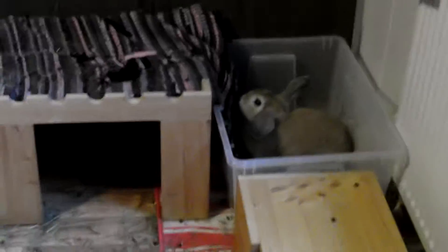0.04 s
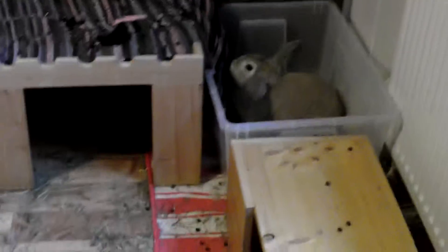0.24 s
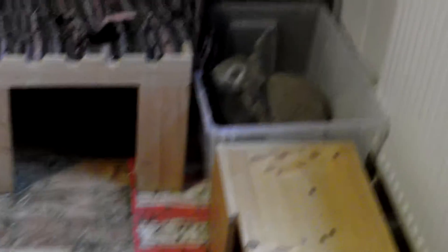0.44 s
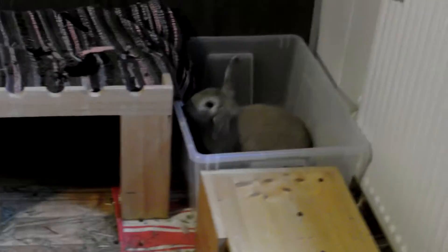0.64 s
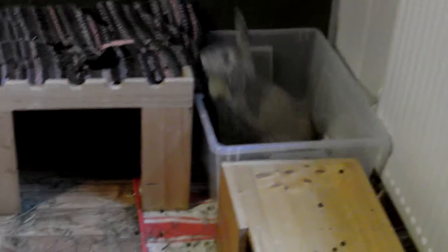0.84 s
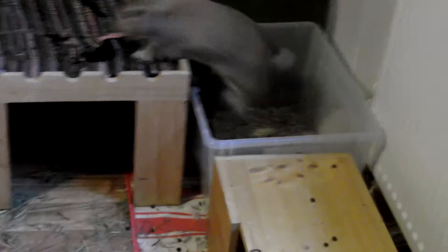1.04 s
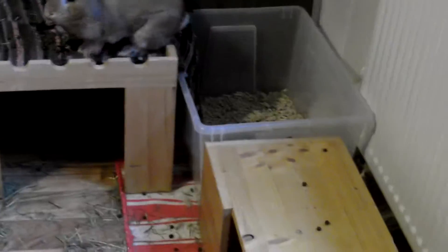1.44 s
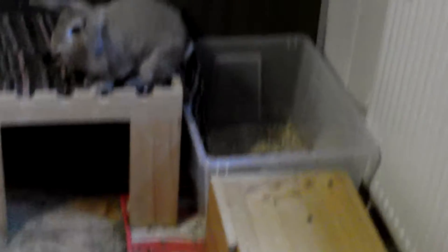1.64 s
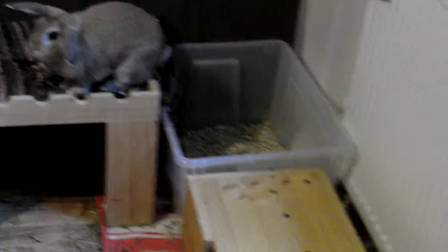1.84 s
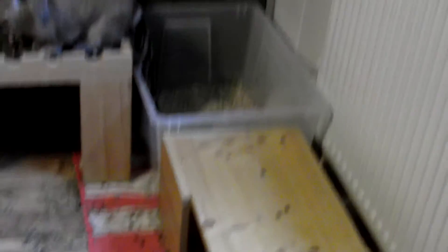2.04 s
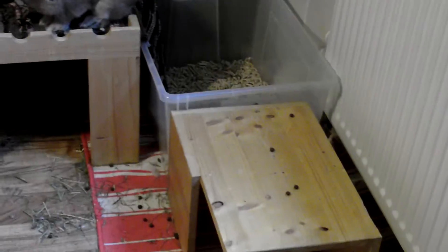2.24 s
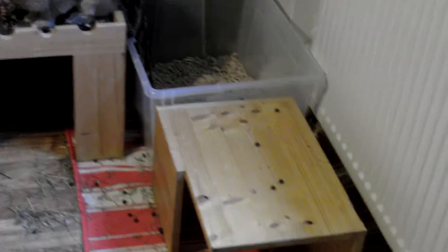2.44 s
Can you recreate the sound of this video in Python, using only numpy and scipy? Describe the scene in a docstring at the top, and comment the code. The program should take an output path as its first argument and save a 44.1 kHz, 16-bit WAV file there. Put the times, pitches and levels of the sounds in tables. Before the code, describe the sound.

A rabbit scuffs and jumps from a plastic box onto wood, with close camera handling noise.

```python
"""Rabbit and camera handling

In a quiet room a rabbit scuffs in a plastic litter box, kicks off and hops about on a rug-covered
wooden shelter; each paw blow excites the damped modes of the body it strikes. Close by, on the left,
fingers shift on a hand-held camera: its casing rubs and clicks, a fingertip brushes across the
microphone port, and a small lens motor whirrs."""
import sys
import numpy as np
from scipy import signal
from scipy.fft import rfft, irfft
from scipy.io import wavfile

SR = 44100
rng = np.random.default_rng(int(sys.argv[2]) if len(sys.argv) > 2 else 0)


def dump(signal):
    """Clip the signal to [-1, 1] and save it as 16-bit WAV at the path in sys.argv[1]."""
    limited = np.clip(np.atleast_2d(signal).T, -1, 1)
    pcm = np.round(limited * 32767).astype(np.int16)
    wavfile.write(sys.argv[1], SR, pcm)


N = 114660
TIME = np.arange(N) / SR
HZ = np.maximum(np.arange(N // 2 + 1) * SR / N, 1)


def from_db(db):
    """Amplitude ratio of a level in decibels."""
    return 10 ** (np.asarray(db) / 20)


def rms_one(x):
    """Normalisation to unit rms."""
    return x / np.sqrt(np.mean(x ** 2) + 1e-20)


def pan(x, right_drop_db):
    """Interchannel level difference: the left keeps its level, the right drops."""
    return x * from_db([[0], [-right_drop_db]])


def noise(spectrum, channels=1):
    """Spectral shaping of white noise by (frequency [Hz], level [dB]) points; unit rms."""
    hz, db = np.transpose(spectrum)
    gain = from_db(np.interp(np.log(HZ), np.log(hz), db))
    return rms_one(irfft(rfft(rng.standard_normal((channels, N))) * gain, N))


def grain(rate_hz, depth_db):
    """Random amplitude modulation: the uneven gain of sticking and slipping."""
    slow = irfft(rfft(rng.standard_normal(N)) / (1 + (HZ / rate_hz) ** 2), N)
    return rms_one(from_db(depth_db * rms_one(slow)))


def resonant(modes):
    """Forced vibration: friction noise drives steep resonances in steady state; unit rms."""
    out = 0
    for hz, width, db in modes:
        b, a = signal.iirpeak(hz, hz / width / 1.55, fs=SR)  # two passes narrow the band to width
        first_pass = signal.lfilter(b, a, rng.standard_normal(N + SR))
        out = out + from_db(db) * rms_one(signal.lfilter(b, a, first_pass)[SR:])
    return rms_one(out)


def stroke(s, rise, fall):
    """Contact envelope: a Gaussian swell up to time s, then a rounded exponential release."""
    t = TIME - s
    return np.exp(np.where(t < 0, -(t / rise) ** 2, 1 - np.hypot(1, t / fall)))


def clicks(times, sizes):
    """Brief contact forces idealised as impulses."""
    out = np.zeros(N)
    np.add.at(out, np.clip((times * SR).astype(int), 0, N - 1), sizes)
    return out


def ring(force, hz, t60):
    """Damped oscillator: a unit impulse starts a unit sine that falls 60 dB in t60 seconds."""
    r, w = from_db(-60 / (t60 * SR)), 2 * np.pi * hz / SR
    return signal.lfilter([0, np.sin(w)], [1, -2 * r * np.cos(w), r * r], force + 1e-18)


def low_cut(x, hz):
    """Radiation efficiency: small bodies give off little bass."""
    return signal.sosfilt(signal.butter(3, hz, "high", fs=SR, output="sos"), x)


def paws(hits, modes, focus_db, soft_hz):
    """Modal excitation: the spot struck favours modes near one pitch; soft contact limits the treble."""
    s, db, favoured_hz = np.transpose(hits)
    spread_db = 3.78 * rng.standard_normal((len(s), len(modes)))
    out = 0
    for k, (hz, mode_db, t60) in enumerate(modes):
        octaves_off = np.abs(np.log2(hz / favoured_hz))
        force = clicks(s, from_db(db + mode_db - focus_db * octaves_off + spread_db[:, k]))
        out = out + (-1) ** k * ring(force, hz, t60)  # neighbouring modes alternate in sign
    softened = signal.sosfilt(signal.butter(4, soft_hz, fs=SR, output="sos"), out)
    return low_cut(softened, hz=112)


def room_air():
    """Stationary noise of room air and microphone hiss, uncorrelated between the sides."""
    # noise spectrum: (frequency [Hz], relative density [dB])
    spectrum = [(25,2),(70,7.5),(160,6),(300,8.5),(450,12),(620,19),(720,22.5),(950,13.5),(1120,3),(2500,1.5),(5000,0),(11000,-3.5)]
    return pan(from_db(-61.5) * noise(spectrum, channels=2), -0.5)


def lens_motor():
    """Structure-borne sound: narrow resonances carry the motor's fluttering whirr through the casing."""
    # motor envelope: (time [s], level [dB])
    envelope = [(0,-44.5),(.12,-56.5),(.19,-42.5),(.3,-44),(.42,-51.5),(.53,-64),(.73,-67),(.81,-46),(.92,-46),(1.1,-57.5),(1.25,-65),(1.37,-82),(1.42,-51),(1.48,-55.5),(1.6,-46.5),(1.73,-49),(1.98,-45.5),(2.12,-53.5),(2.33,-49),(2.43,-58),(2.49,-45.5),(2.54,-55.5),(2.58,-46.5)]
    # motor resonances: (frequency [Hz], bandwidth [Hz], level [dB])
    modes = [(567,350,-30),(691.7,38.7,2.5),(798,41.3,-1),(943.5,42,-12),(1690,186,-22)]
    level = from_db(np.interp(TIME, *np.transpose(envelope)))
    return pan(level * resonant(modes) * grain(rate_hz=17, depth_db=1.25), 14.5)


def casing_rubs():
    """Stick-slip friction: sliding fingers hiss and ring the casing at a pitch set by the grip."""
    # finger slides: (time [s], rise [s], fall [s], hiss level [dB], ring level [dB], ring pitch [Hz])
    rubs = [(.008,0.027,0.023,-61,-52.5,2090),(0.049,0.016,0.026,-63.5,-52.5,2070),(.09,0.066,0.12,-61.5,-64,2040),(0.261,0.039,0.058,-53.5,-44,2200),(0.328,0.04,0.017,-45.5,-36.5,2154),(.425,0.051,0.046,-63,-64,2430),(.805,0.039,0.029,-57,-65,2380),(1.807,0.019,0.019,-58,-68,2260),(1.916,.01,0.01,-61,-87,2300),(1.964,0.0093,0.013,-59.5,-72,2360),(2.1,0.065,0.026,-62.5,-73,2280)]
    # friction spectrum: (frequency [Hz], level [dB])
    spectrum = [(200,-22),(600,-13),(1500,1.5),(3300,3.5),(4200,-1),(5400,7),(6500,1.5),(8000,-2),(11000,-11)]
    # casing resonances: (frequency / ring pitch [1], bandwidth / frequency [1], level [dB])
    casing = [(.25,.25,-8),(.52,.13,-7),(.85,.15,-11),(1.0,.1,0),(1.12,.1,-4)]
    hiss, out = noise(spectrum, channels=2), 0
    for s, rise, fall, hiss_db, ring_db, hz in rubs:
        modes = [(ratio * hz, width * ratio * hz, db) for ratio, width, db in casing]
        body = pan(resonant(modes), 21)  # further left than the hiss
        out = out + stroke(s, rise, fall) * (from_db(hiss_db) * hiss + from_db(ring_db) * body)
    return pan(out * grain(rate_hz=110, depth_db=1.2), 14.5)


def paw_scuffs():
    """Sliding friction: litter and rug shift under the paws in grainy swells of noise."""
    # scuffs: (time [s], rise [s], fall [s], level [dB])
    scuffs = [(.07,.07,0.041,-53),(.62,0.082,0.065,-66),(0.819,0.021,0.033,-62.5),(.9,0.034,0.064,-50.5),(0.978,0.0091,0.034,-44.5),(1.13,0.036,0.032,-62),(1.384,0.031,0.011,-63.5),(1.89,.025,0.067,-57.5)]
    # scuffing spectrum: (frequency [Hz], level [dB])
    spectrum = [(60,-49),(180,-13.5),(360,3.5),(560,-3),(850,-3),(1300,-16),(2200,-27.5),(5000,-42),(11000,-54)]
    effort = sum(from_db(db) * stroke(s, rise, fall) for s, rise, fall, db in scuffs)
    return noise(spectrum)[0] * grain(rate_hz=106, depth_db=1.5) * effort


def box_knocks():
    """Impact excitation: paws set the modes of the plastic litter box ringing."""
    # paw blows: (time [s], relative level [dB], favoured pitch [Hz])
    knocks = [(0.068, -33.5, 750), (0.079, -43.5, 493), (0.658, -64, 401), (0.875, -45.5, 790),
              (0.889, -39, 418), (0.91, -44, 710), (0.925, -39, 720), (0.931, -31.5, 333),
              (0.939, -42, 383), (0.956, -33.5, 460), (0.967, -22.5, 764), (0.974, -27, 397),
              (0.987, -25.5, 404), (0.994, -52, 480), (1, -44.5, 288), (1.008, -38, 400),
              (1.027, -39.5, 417), (1.047, -41, 355), (1.06, -48, 320), (1.077, -33.5, 810)]
    # box modes: (frequency [Hz], level [dB], t60 [s])
    modes = [(148,-16.5,0.11),(214,-14.5,0.07),(281,-6,0.11),(341.7,1.5,.09),(397,0,0.062),(492,-5,0.081),(689,3,0.054),(821,-0.5,0.062),(991,-0.5,0.049),(1090,-19.5,.07),(1171,-8.5,0.061),(1320,-8.5,0.11),(1767,-8,0.073),(2220,-22,.05),(2976,9,0.03)]
    return from_db(-11) * paws(knocks, modes, focus_db=7, soft_hz=2030)


def room(x, t60_s=0.11, delay_s=0.002, level_db=-11):
    """Reverberation: a short diffuse tail decays exponentially, different at each side."""
    t = TIME[:SR // 2]
    tail = noise([(100, -7), (2000, -16), (10000, -6.5)], channels=2)[:, :SR // 2]
    tail = tail * np.exp(-np.log(1000) * t / t60_s) * (t > delay_s)
    tail = tail / np.sqrt(np.sum(tail ** 2))
    return from_db(level_db) * signal.fftconvolve(x[None], tail, axes=1)[:, :N]


def finger_bumps():
    """Soft contact: a fingertip landing on and leaving the casing gives dull bursts of noise."""
    # touches: (time [s], level [dB])
    bumps = [(.196,-53.5),(.326,-60),(0.436,-59)]
    touch = sum(from_db(db) * stroke(s, rise=0.005, fall=0.01) for s, db in bumps)
    return pan(touch * noise([(30, 10.5), (150, 2.5), (500, 9), (1500, -22)]), 12)


def casing_snap():
    """Free vibration: a tight cluster of impulses rings the plastic casing in one sharp snap."""
    # impulses: (time [s], level [dB])
    snaps = [(.2094,-23),(.2101,-14),(.2119,-25.5)]
    # casing modes: (frequency [Hz], level [dB], t60 [s])
    modes = [(532,-15.5,0.029),(1160,-17.5,0.02),(2117,2.5,0.016),(2546,2,0.0056),(3580,-11,0.024),(4450,-6.5,0.0052),(6470,-16.5,0.0043),(8350,-32.5,0.0084)]
    s, db = np.transpose(snaps)
    snap = sum((-1) ** k * ring(clicks(s, from_db(db + mode_db)), hz, t60)
               for k, (hz, mode_db, t60) in enumerate(modes))
    return pan(low_cut(snap, hz=510), 16)


def port_brushes(split_hz=2700, bass_lead_s=0.02):
    """Friction and cavity resonance: skin sweeps the left port, lows first, then hiss and a hollow ring."""
    # sweeps: (time [s], rise [s], fall [s], hiss level [dB], ring level [dB])
    brushes = [(.361,0.018,0.014,-15.5,-40),(0.593,0.02,0.012,-50.5,-52.5),(1.168,0.021,0.012,-50.5,-41)]
    # skin friction spectrum: (frequency [Hz], level [dB])
    skin_spectrum = [(30,-17),(120,-7.5),(300,0),(800,5.5),(1500,3),(3500,1.5),(5000,-1.5),(7000,1),(11000,-4)]
    # port cavity spectrum: (frequency [Hz], level [dB])
    cavity_spectrum = [(300,-39),(550,-3),(700,7.5),(1000,2),(1500,1),(1900,-16.5),(4000,-15.5)]
    skin = noise(skin_spectrum)[0] * grain(rate_hz=340, depth_db=1.5)
    low = signal.sosfiltfilt(signal.butter(2, split_hz, fs=SR, output="sos"), skin)
    cavity = noise(cavity_spectrum)
    hiss, hollow = 0, 0
    for s, rise, fall, hiss_db, ring_db in brushes:
        early = stroke(s - bass_lead_s, 0.4 * rise, 1.38 * fall)
        late = stroke(s, rise, fall)
        hiss = hiss + from_db(hiss_db) * (low * early + (skin - low) * late)
        hollow = hollow + from_db(ring_db) * cavity * late
    return pan(hiss, 36) + pan(hollow, 16.5)


def shelter_thumps():
    """Cushioned impact: the rug softens each paw blow, so the wooden shelter answers with a dull thump."""
    # paw blows: (time [s], relative level [dB], favoured pitch [Hz])
    thumps = [(1.155, -42.5, 646), (1.351, -50.5, 474), (1.373, -44.5, 274), (1.852, -29, 590),
              (1.856, -28, 560), (1.882, -33, 277), (1.903, -34.5, 660), (1.958, -37, 620),
              (2.443, -48, 692)]
    # shelter modes: (frequency [Hz], level [dB], t60 [s])
    modes = [(122,-13.5,0.11),(193,-15,0.094),(282.4,-6.5,0.12),(370,-3,0.044),(480,-6,0.071),(563,2.5,0.058),(633,0,0.028),(789,-3,0.052),(940,-4.5,0.044)]
    return from_db(-4.5) * paws(thumps, modes, focus_db=6.5, soft_hz=930)


def casing_ticks(fall_s=0.0009):
    """Broadband transients: tiny dry ticks of the casing die away too fast to have a pitch."""
    # ticks: (time [s], relative level [dB])
    ticks = [(1.5258,-52),(1.5947,-54),(1.7568,-62),(1.941,-60),(2.4727,-60),(2.5116,-53)]
    envelope = sum(from_db(db) * (TIME >= s) * np.exp(-np.abs(TIME - s) / fall_s) for s, db in ticks)
    return pan(from_db(5) * envelope * noise([(200, -10), (1500, 5), (11000, 5)]), 7)


def scene():
    """Superposition: the rabbit with its reverberation, the dry handling noises and the room air."""
    air = room_air()
    box = paw_scuffs() + box_knocks()
    shelter = shelter_thumps()
    rabbit = pan(box, 0.5) + pan(shelter, 4) + room(box + shelter)
    handling = port_brushes() + casing_rubs() + casing_snap() + casing_ticks() + finger_bumps()
    return air + rabbit + handling + lens_motor()


def record(dry, cutoff_hz=11550):
    """Band limiting: a steep elliptic low-pass removes the top of the treble."""
    return signal.sosfilt(signal.ellip(12, .2, 80, cutoff_hz, fs=SR, output="sos"), dry)


dry = scene()
out = record(dry)
dump(out)
```